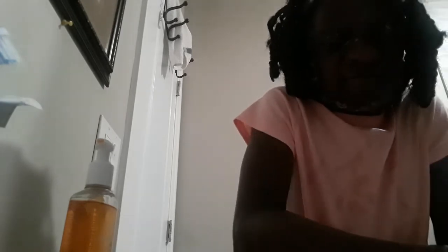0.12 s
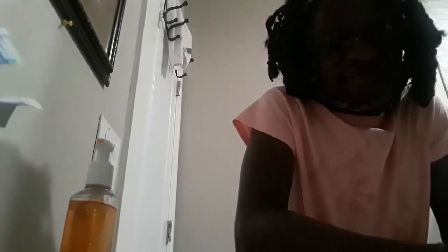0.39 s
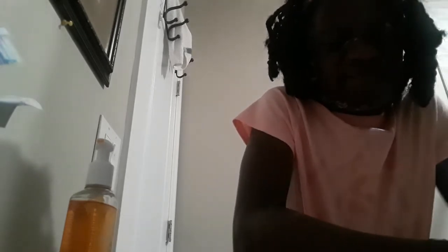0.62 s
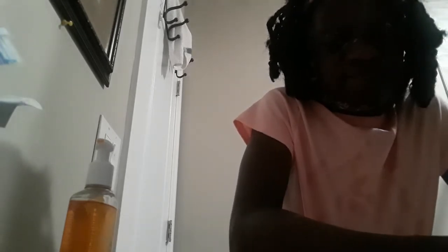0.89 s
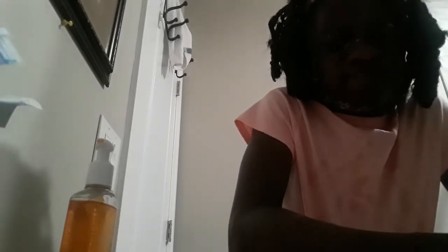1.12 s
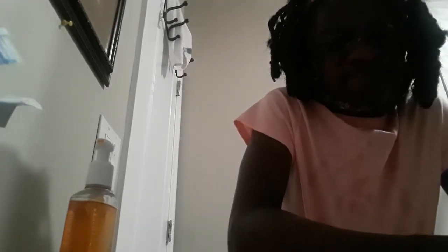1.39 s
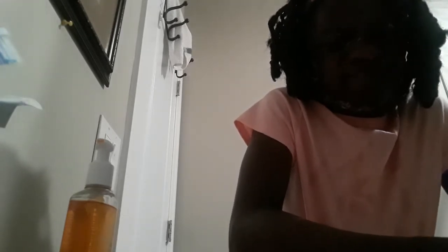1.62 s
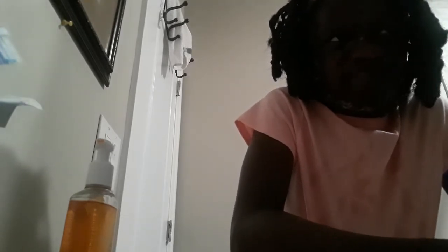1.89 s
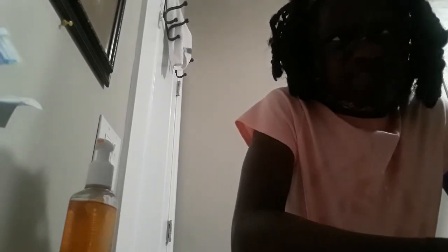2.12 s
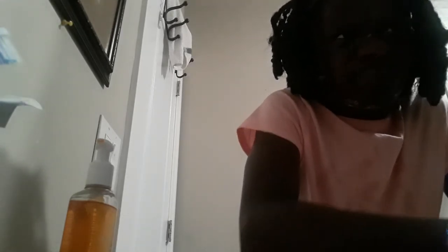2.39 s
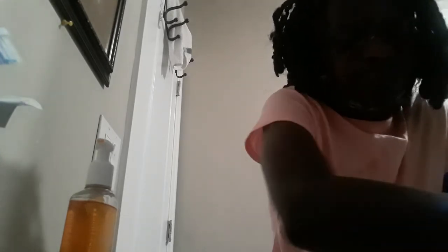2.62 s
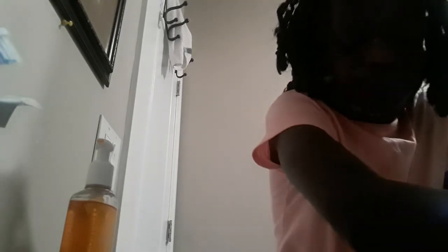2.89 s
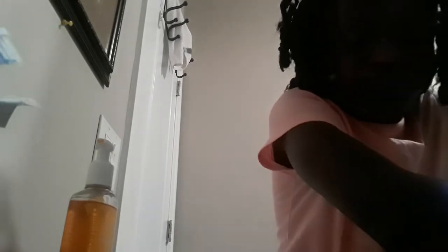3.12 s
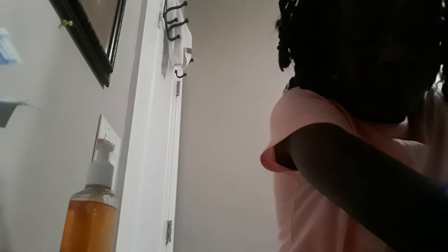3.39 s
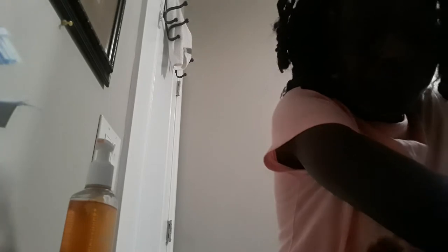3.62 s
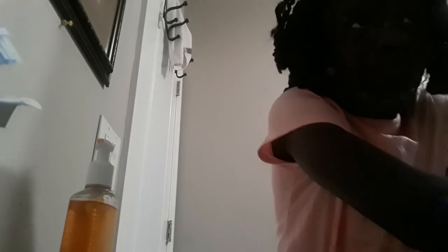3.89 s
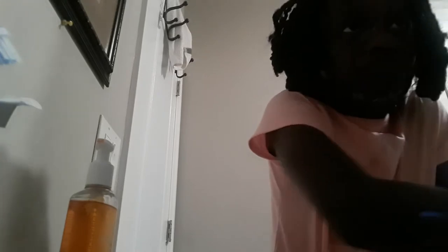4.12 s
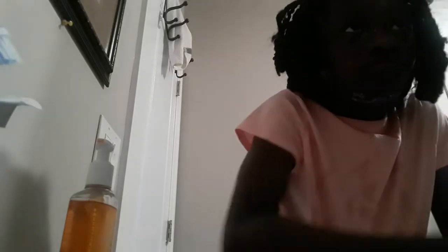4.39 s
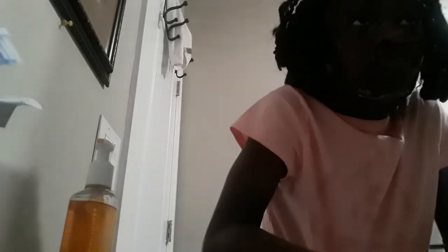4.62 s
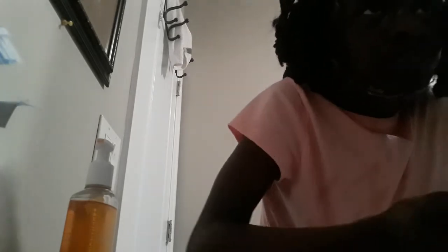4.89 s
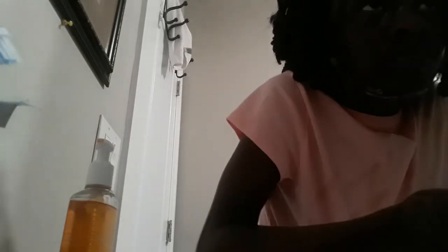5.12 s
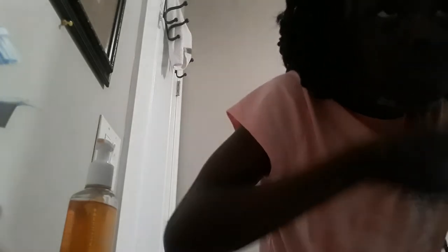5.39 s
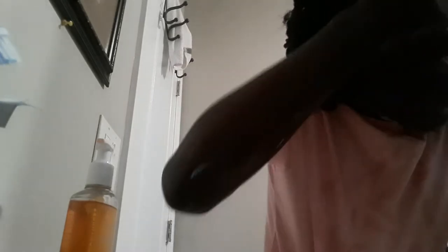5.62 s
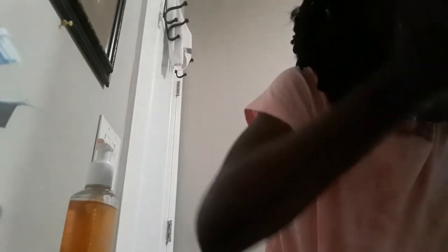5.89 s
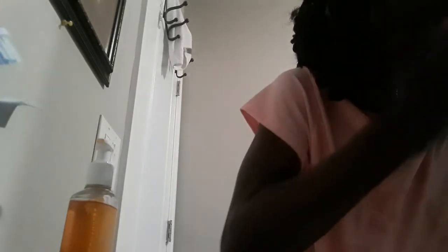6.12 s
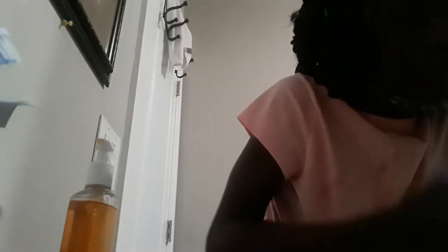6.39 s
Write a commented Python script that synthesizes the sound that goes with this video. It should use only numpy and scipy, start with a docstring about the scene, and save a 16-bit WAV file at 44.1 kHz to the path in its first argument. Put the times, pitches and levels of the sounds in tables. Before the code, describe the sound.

A tap runs with a steady bright hiss into a basin, while drops plink, hands bump softly and the drain gulps in a small tiled room.

```python
"""A steady tap hiss runs throughout: water runs into a basin in a small tiled room, heard at two ports on the counter.
The stream is turbulent noise coloured by resonances; each reaches the ports with its own level, likeness and phase.
Drops from wet hands plink as gliding bubble tones, hands bump softly on the basin and the drain gulps air.
Wall reflections answer drops, bumps and gulps, and a fan hums low as a sum of wavering tones."""
import sys
import numpy as np
from scipy import signal
from scipy.fft import irfft
from scipy.io import wavfile
from scipy.ndimage import uniform_filter1d

SR = 44100
rng = np.random.default_rng(int(sys.argv[2]) if len(sys.argv) > 2 else 0)


def wav_out(sig):
    """Save sig, one row per channel (or a flat mono array), as 16-bit PCM at SR to the path in sys.argv[1]."""
    wavfile.write(sys.argv[1], SR, np.round(np.clip(np.atleast_2d(sig).T, -1, 1) * 32767).astype(np.int16))


def amplitude_ratio(level_db):
    """Convert a level in decibels to the matching linear amplitude (field) ratio."""
    exponent = np.asarray(level_db, float) / 20
    return 10 ** exponent


N = 286650

# fan tones: pitch_hz, mean level_db (rms)
FAN_TONES = [(114, -68), (120, -62), (144, -51), (160, -60.5), (240, -59), (574, -63.5)]
# soft bumps of hands on the basin, before placing: start_s, peak level_db, start pitch_hz
HAND_BUMPS = [(.278, -40, 400), (.521, -37, 330), (0.69, -34, 356), (1.947, -47, 404), (2.681, -39, 438),
              (3.22, -40, 388), (3.495, -40, 310), (4.503, -43, 318), (4.634, -31.5, 356),
              (4.647, -39, 320), (4.889, -38, 480), (5.889, -41.5, 300), (5.931, -38, 380),
              (6.088, -25, 360), (6.138, -34, 380)]
# gulps of air in the drain, before placing: start_s, peak level_db, start pitch_hz
DRAIN_GULPS = [(.355, -36.5, 780), (.438, -39.5, 567), (3.455, -40.5, 578), (3.635, -39.5, 702),
               (3.735, -42, 675), (4.052, -39.5, 816), (6.14, -32.5, 750)]
# drops that trap a bubble, before placing: start_s, peak level_db, start pitch_hz, rise_octaves
DROP_PLINKS = [(0.084, -26, 3300, 0.74), (0.893, -27, 1950, .65), (0.914, -34, 2140, .15),
               (2.245, -31, 3880, .2), (2.777, -30, 3900, 0.36), (3.853, -24.5, 2800, 0.72),
               (4.224, -30.5, 2390, .15), (4.808, -32.5, 2240, 0.23), (5.016, -33, 2020, 1),
               (5.1467, -23, 1850, 1.9), (5.388, -40, 4460, .2), (5.3955, -20.5, 2600, 1.46),
               (5.413, -31, 4400, 0.38), (6.09, -26.5, 3180, 0.44), (6.199, -29, 4000, .25)]
# running water; only the departure from each table's mean is used: start_s, level_db
GURGLE_LEVEL = [(0.0, -49.5), (1.19, -51.5), (1.36, -50.5), (5.36, -51.5), (5.79, -48.5), (6.15, -48),
                (6.5, -51.5)]  # low range
SPLASH_LEVEL = [(0.0, -40), (1.16, -41), (1.83, -40.5), (3.37, -41.5), (5.01, -41), (5.18, -40), (6.5, -41)]  # middle range
HISS_LEVEL = [(0.0, -25), (0.25, -24), (2.24, -24.5), (3.24, -26), (3.73, -24.5), (5.03, -25.5),
              (5.38, -24.5), (6.5, -24.5)]  # treble
# resonances of basin, drain and room: centre_hz, width_hz, left_db_per_hz, right_db_per_hz
BASIN_MODES = [(125.4, 16, -71.5, -67), (176, 32, -71.5, -72.5), (224, 47, -78, -75.5), (320, 48, -80, -77),
               (403, 270, -85, -77.5), (570, 66, -83, -76.5), (726, 150, -74, -75.5),
               (769, 19, -68.5, -61.5), (808, 43, -75, -67.5), (866, 85, -78, -71.5),
               (1110, 166, -74.5, -76), (1360, 163, -73, -69.5), (1617, 78, -84.5, -69),
               (1834, 140, -70, -67), (2022, 242, -71.5, -68.5), (2245, 130, -68, -69),
               (2690, 210, -77, -79.5), (3170, 580, -80, -78), (3237, 190, -80, -68),
               (3530, 210, -74, -69.5), (3985, 600, -84, -73), (4480, 380, -83.5, -70),
               (4900, 260, -77.5, -82), (5170, 740, -72, -71), (5740, 640, -78, -72.5)]
# resonances that colour the fine spray: centre_hz, width_hz, left_db_per_hz, right_db_per_hz
SPRAY_MODES = [(6399, 334, -67.7, -66.9), (7373, 333, -55.2, -73.6), (7608, 220, -54.4, -60.0),
               (7800, 500, -66, -58), (8000, 130, -63, -54), (8305, 195, -61.2, -57.1),
               (8600, 150, -64, -55), (8800, 420, -66, -61), (9391, 352, -73.0, -69.4),
               (10268, 1257, -65.2, -66.6), (10878, 514, -54.1, -58.5), (11137, 359, -54.3, -58.6),
               (11719, 633, -56.7, -59.2), (12173, 832, -58.2, -58.2), (12801, 1034, -68.5, -67.2),
               (13522, 579, -66.9, -67.3), (14164, 354, -62.0, -65.6), (14682, 316, -57.3, -62.1),
               (15075, 855, -63.5, -61.9), (15512, 297, -61.6, -49.1), (15730, 120, -62, -60)]
# the basin then spray resonances, compared at the two ports: likeness (0-1), right_lead_rad
PORT_RELATION = [(1, 0), (1, -0.03), (1, -0.14), (1, -0.3), (1, -0.37), (0.76, 0), (0.5, -0.51), (1, -0.02),
                 (0.9, -0.3), (0.54, -2.31), (0.58, -2.43), (0.77, -1.9), (0.95, -3.12), (0.87, -2.85),
                 (1, 0.43), (0.75, 0.21), (1, 2.34), (0.96, 2.78), (0.53, 1.9), (0.48, -1.94),
                 (0.62, -0.89), (0.29, -0.39), (0.72, 0.09), (0.42, 0.9), (0.65, -2.65), (0.89, -0.32),
                 (1, -1.77), (1, -0.17), (0.26, -2.5), (0.4, -2.5), (1, 2.43), (0.97, -1.68), (1, 0.92),
                 (0.72, 1.34), (0.72, 2.85), (0.93, 2.39), (0.57, -0.18), (0.53, 1.84), (0.94, 1.04),
                 (1, 0.28), (1, -0.97), (0.82, 1.42), (1, -0.58), (1, -1.26), (0.62, 1.9), (0.7, 0.4)]
# broad wash between the resonances: frequency_hz, level_db_per_hz
WASH_SPECTRUM = [(25, -96), (60, -83), (100, -79), (300, -82), (1000, -85.5), (2700, -90), (6000, -99.5),
                 (7000, -68), (9500, -70.5), (13000, -67.5), (13900, -76), (16000, -64)]

BUMP_CYCLES, BUMP_GLIDE_OCT = 2.42, -0.3
GULP_CYCLES, GULP_GLIDE_OCT = 13.3, 0.1
SLOSH_DB, SLOSH_SHARE, SLOSH_RISE_S, SLOSH_T60_S = -46, 0.17, 0.0086, 0.26
PLINK_CYCLES, TICK_DB = 17.8, -3
DROP_LEFT_LAG_MS, DROP_LEFT_DB, DROP_RIGHT_DB = 0.3, -2, 4
DROP_SHADOW_HZ = 2100  # the left port is shaded from the drops' treble
GURGLE_TOP_HZ, SPLASH_TOP_HZ, STEADY_BELOW_HZ = 1000, 6500, 500
RIGHT_LAG_MS, EDGE_HZ = 0.6, 15750


def evened(x):
    """Normalisation: divide by the root mean square, giving unit power."""
    return x / np.sqrt(np.mean(x ** 2) + 1e-20)


def add(mix, start_s, sound):
    """Superposition: sum a sound into the mix, cut at the mix's end."""
    part = mix[round(start_s * SR):][:len(sound)]
    part += sound[:len(part)]


def fan():
    """Additive synthesis: the tones of one motor share a wavering pitch, while each level wavers alone."""
    def slow():
        noise = rng.standard_normal(N)
        return evened(uniform_filter1d(uniform_filter1d(noise, 5000), 5000))

    warped_s = np.cumsum(1 + 0.0012 * slow()) / SR
    hum = np.zeros(N)
    for pitch_hz, level_db in FAN_TONES:
        gain = np.sqrt(2) * amplitude_ratio(level_db + 1.04 * slow())
        hum += gain * np.sin(2 * np.pi * (pitch_hz * warped_s + rng.random()))
    return hum


def tail(t60_s, start):
    """Reverberation: sparse random-sign taps decay exponentially, with other taps at each port."""
    length, spacing = SR // 2, 8
    taps = np.zeros((2, length))
    slots = np.arange(start, length - spacing, spacing)  # start in samples
    places = slots + rng.integers(0, spacing, (2, len(slots)))
    signs = rng.choice([-1., 1.], (2, len(slots)))
    np.put_along_axis(taps, places, signs, 1)
    taps *= amplitude_ratio(-60 * np.arange(length) / SR / t60_s)
    return taps / np.linalg.norm(taps[0])  # unit energy at the left


def room(x):
    """Convolution: the tiled walls answer each sound with a decaying tail of reflections."""
    return signal.fftconvolve(x[None], tail(0.22, start=350), axes=1)[:, :N]


def bubble(peak_db, start_hz, glide_oct, cycles):
    """Gliding resonance: a brief tone swells and dies while its pitch moves by glide_oct."""
    middle_hz = start_hz * 2 ** (glide_oct / 2)
    u = np.arange(0, 1, middle_hz / (cycles * SR))  # share of the tone's life
    pitch_hz = start_hz * 2 ** (glide_oct * u)
    swell = np.sin(np.pi * u ** 0.72) ** 0.63
    return amplitude_ratio(peak_db) * swell * np.sin(2 * np.pi * np.cumsum(pitch_hz) / SR)


def bumps():
    """Damped oscillation: dull knocks sag and longer gulps rise, each with a slosh of band-passed noise."""
    tones, slosh = np.zeros((2, N))
    t = np.arange(SR // 6) / SR
    for start_s, level_db, pitch_hz in HAND_BUMPS:
        add(tones, start_s, bubble(level_db, pitch_hz, BUMP_GLIDE_OCT, BUMP_CYCLES))
    for start_s, level_db, pitch_hz in DRAIN_GULPS:
        add(tones, start_s, bubble(level_db, pitch_hz, GULP_GLIDE_OCT, GULP_CYCLES))
    for start_s, level_db, _ in [*HAND_BUMPS, *DRAIN_GULPS]:
        slosh_db = SLOSH_DB + SLOSH_SHARE * (level_db + 36)
        decay = amplitude_ratio(slosh_db - 60 * t / SLOSH_T60_S)
        add(slosh, start_s, decay * np.minimum(t / SLOSH_RISE_S, 1))
    band = signal.butter(2, [220, 720], "bandpass", fs=SR, output="sos")
    rough = evened(signal.sosfilt(band, rng.standard_normal(N)))
    return tones + slosh * rough


def drops():
    """Bubble resonance: pitch rises as a trapped bubble nears the surface; clear plinks lie over faint ones."""
    out = np.zeros(N)
    band = signal.butter(2, [1800, 6500], "bandpass", fs=SR, output="sos")
    tick_decay = amplitude_ratio(-60 * np.arange(600) / SR / 0.006)
    for start_s, level_db, pitch_hz, rise_oct in DROP_PLINKS:
        add(out, start_s, bubble(level_db, pitch_hz, rise_oct, PLINK_CYCLES))
        tick = signal.sosfilt(band, rng.standard_normal(600) * tick_decay)  # the drop breaking the surface
        add(out, start_s + 0.002, amplitude_ratio(level_db + TICK_DB) * tick)
    for when, size, pitch, glide in rng.random((200, 4)):
        faint_db = -45 - 2.5 * np.log(size + 0.05)
        add(out, when * N / SR, bubble(faint_db, 1800 * 2.8 ** pitch, 0.6 * glide, 8.5))
    return out


def turbulence(flicker_db, slow_db):
    """Modulated noise: two unrelated noises share the flow's level, slow drifts and a treble-weighted flicker."""
    hop = 128
    frames, hz = N // hop + 5, np.fft.rfftfreq(512, 1 / SR)
    a, b, c, d, slow = rng.standard_normal((5, len(hz), frames))
    slow = evened(uniform_filter1d(uniform_filter1d(slow, 6, 0), 70, 1))  # smooth in pitch, then time
    flicker = evened(uniform_filter1d(rng.standard_normal(frames), 8))

    frame_s = np.arange(frames) * hop / SR
    tables = (GURGLE_LEVEL, SPLASH_LEVEL, HISS_LEVEL)
    levels = np.array([np.interp(frame_s, *np.transpose(table)) for table in tables])
    departure = levels - levels.mean(1)[:, None]
    swing = departure[np.searchsorted([GURGLE_TOP_HZ, SPLASH_TOP_HZ], hz)]
    swing *= np.clip(hz / STEADY_BELOW_HZ, 0, 1)[:, None] ** 2  # the room rumble stays steady

    bright = (hz / 12000)[:, None]
    field_db = swing + bright * flicker_db * flicker + slow_db * slow
    spectra = np.array([a + 1j * b, c + 1j * d]) * amplitude_ratio(field_db)
    return evened(signal.istft(spectra, nperseg=512, noverlap=384)[1][:, :N])


def port_spectra():
    """Spatial coherence: resonances have their own likeness and phase; the wash is alike only in the bass."""
    hz = np.fft.rfftfreq(16384, 1 / SR)
    wash_hz, wash_db = np.transpose(WASH_SPECTRUM)
    wash = amplitude_ratio(np.interp(np.log(hz + 1), np.log(wash_hz), wash_db)) ** 2
    centre, width, left_db, right_db = np.transpose(np.vstack([BASIN_MODES, SPRAY_MODES]))[:, :, None]
    likeness, lead = np.transpose(PORT_RELATION)[:, :, None]
    shape = 1 / (1 + (2 * (hz - centre) / width) ** 2) ** 2
    left = wash + (amplitude_ratio(left_db) ** 2 * shape).sum(0)
    right = wash + (amplitude_ratio(right_db) ** 2 * shape).sum(0)
    turn = np.exp(1j * (lead - 2 * np.pi * (hz - centre) * RIGHT_LAG_MS / 1000))
    shared_modes = (likeness * amplitude_ratio(left_db) * amplitude_ratio(right_db) * shape * turn).sum(0)
    cross = wash * np.clip(1.2 - hz / 600, 0, 0.997) + shared_modes
    return left, right, cross / np.sqrt(left * right)


def colour(x, gain):
    """Linear filtering: a spectral gain, in amplitude per root Hz, shapes unit-power noise."""
    response = np.fft.fftshift(irfft(gain * np.sqrt(SR / 2)))
    return signal.oaconvolve(x, response, "same")


def stream():
    """Partial coherence: the right port mixes the left port's turbulence with a less related one."""
    left, right, same = port_spectra()
    one, other = turbulence(flicker_db=0.3, slow_db=1.05)
    near, far = tail(0.25, start=60)
    near = signal.lfilter(*signal.butter(1, [700, 7000], "bandpass", fs=SR), near)
    # close walls comb the spectrum finely
    one = evened(one + amplitude_ratio(-10) * signal.oaconvolve(one, near)[:N])
    # the same water by another path
    other = evened(signal.oaconvolve(one, far)[:N] + amplitude_ratio(1) * other)
    unlike = np.sqrt(np.clip(1 - abs(same) ** 2, 0, 1))
    at_left = colour(one, np.sqrt(left))
    at_right = colour(one, np.sqrt(right) * same) + colour(other, np.sqrt(right) * unlike)
    return np.array([at_left, at_right])


def scene():
    """Stereo placement by level and delay: bumps a little right, drops well right and later at the left."""
    hum, knocks, plinks = fan(), bumps(), drops()
    lag = np.zeros(round(DROP_LEFT_LAG_MS * SR / 1000))
    late = np.r_[lag, plinks][:N]
    shaded = signal.lfilter(*signal.butter(2, DROP_SHADOW_HZ, fs=SR), late)
    placed_drops = np.array([amplitude_ratio(DROP_LEFT_DB) * shaded, amplitude_ratio(DROP_RIGHT_DB) * plinks])
    placed_knocks = knocks * amplitude_ratio([[-2.1], [1.5]])
    echo = amplitude_ratio(-5) * room(plinks + knocks)
    return hum + placed_knocks + placed_drops + echo + stream()


def top_cut(x):
    """Nothing passes above the cut-off."""
    return signal.sosfilt(signal.butter(12, 17060, fs=SR, output="sos"), x)


def record(dry):
    """Band limiting: a linear-phase low-pass removes the extreme treble of the finished mix."""
    lowpass = signal.firwin(1201, EDGE_HZ, window=("kaiser", 9), fs=SR)
    limited = signal.oaconvolve(dry, lowpass[None], "same")
    return top_cut(limited)


dry = scene()
out = record(dry)
wav_out(out)
```